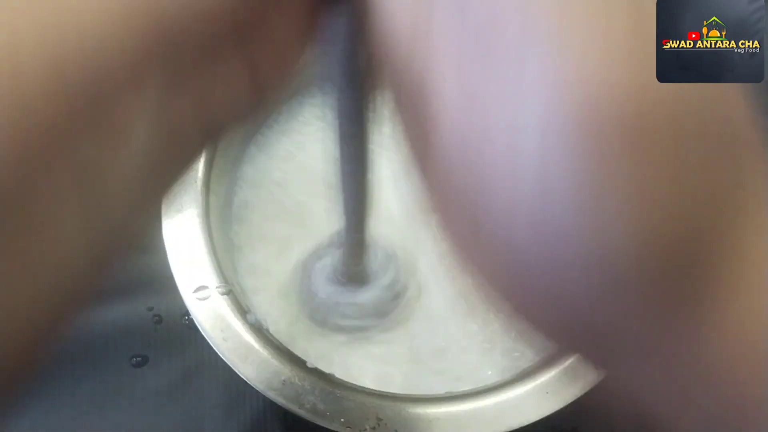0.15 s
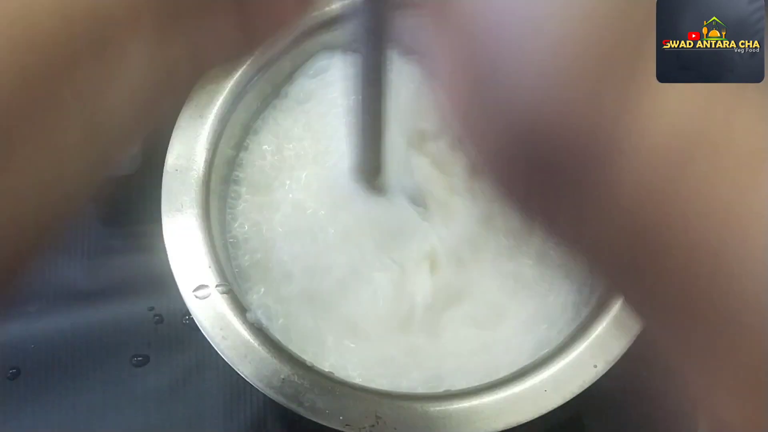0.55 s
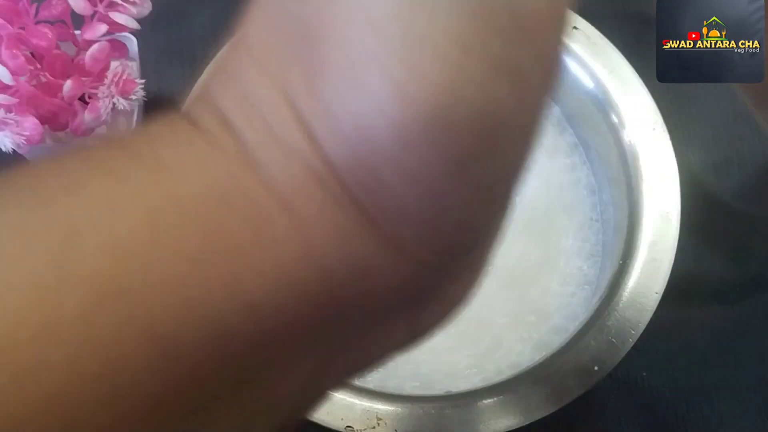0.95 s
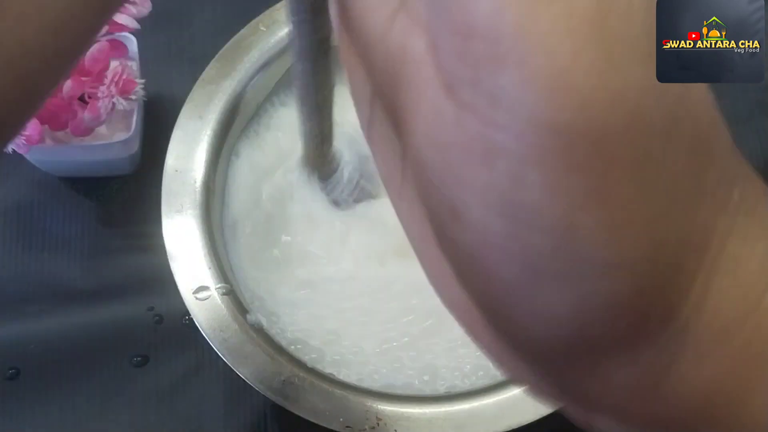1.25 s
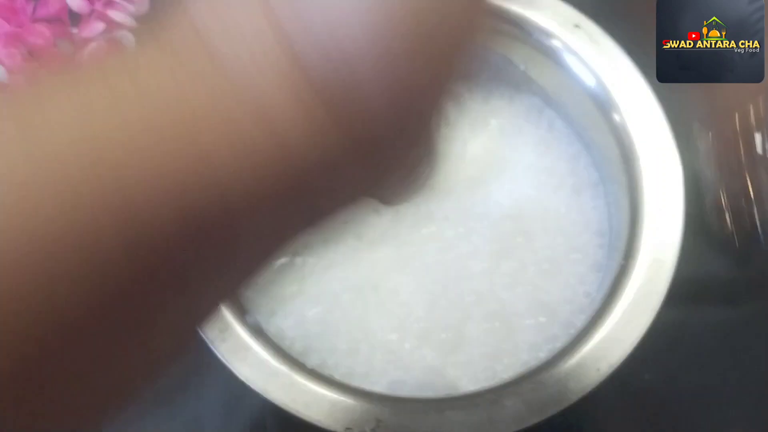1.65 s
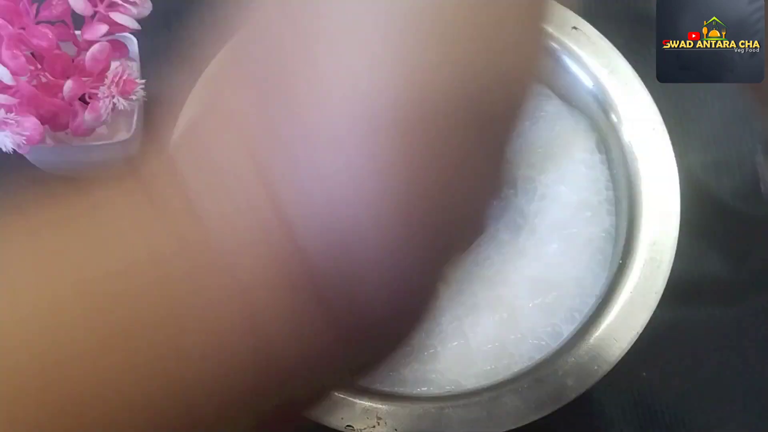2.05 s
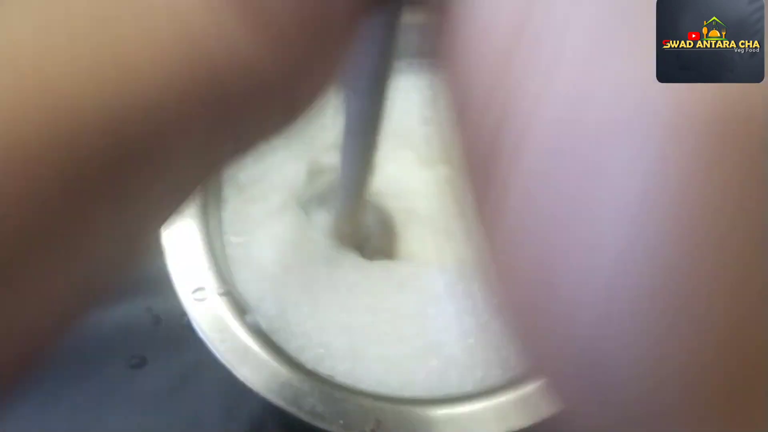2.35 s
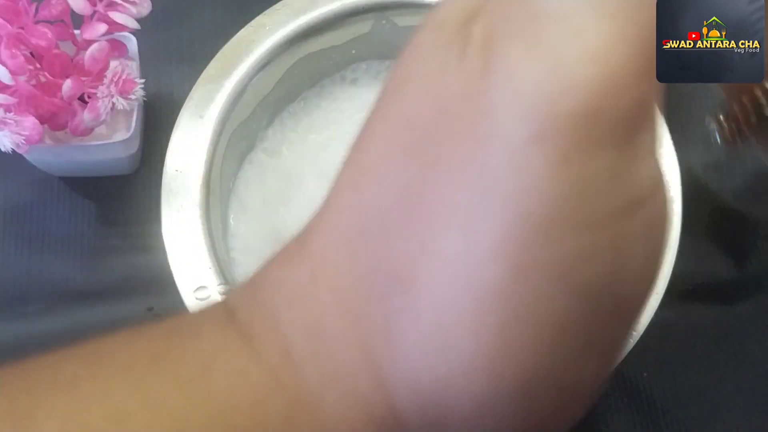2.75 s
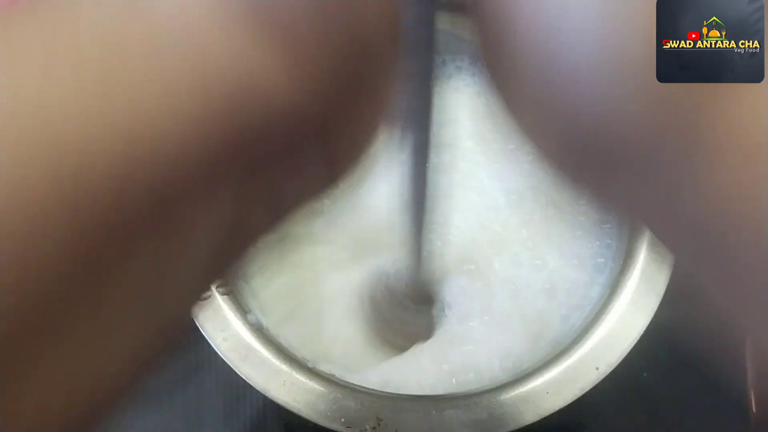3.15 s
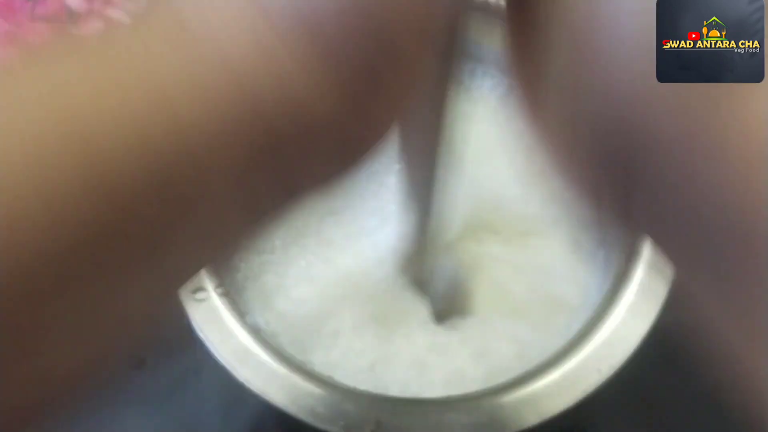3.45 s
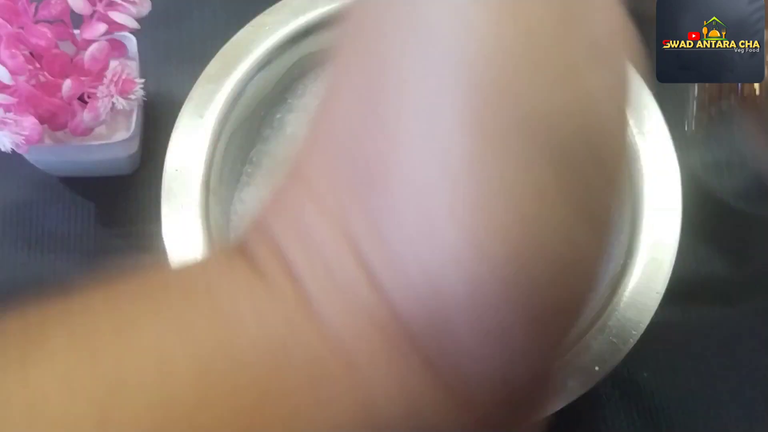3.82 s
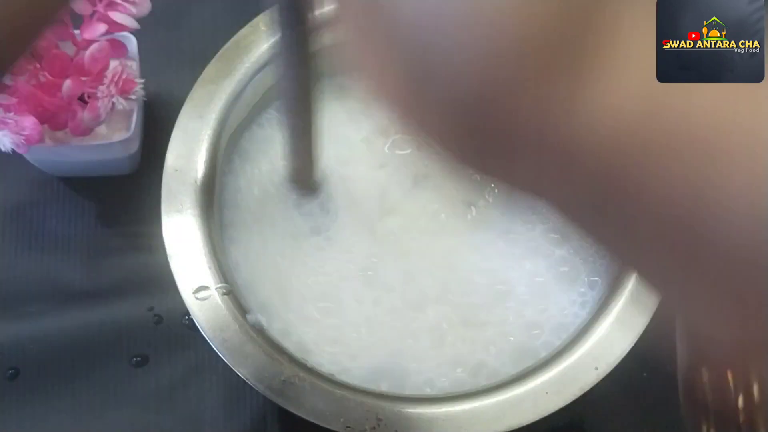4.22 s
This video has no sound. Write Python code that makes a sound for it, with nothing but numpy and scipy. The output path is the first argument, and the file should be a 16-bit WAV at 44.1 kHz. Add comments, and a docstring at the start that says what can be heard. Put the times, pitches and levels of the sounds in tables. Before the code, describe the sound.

Rapid rhythmic swishing of thin yogurt churned in a steel pot, about three strokes a second, with gurgles and hollow knocking gulps, close up.

```python
"""A small kitchen, microphone close to a steel pot of thinned yogurt: a churning stick is rolled back and
forth between the palms, about 3.4 strokes a second. Each stroke whips up bubble clouds (swarms of short
resonances) and spray (noise); cavities gurgle as gliding tones. Air pockets dragged under by the head collapse
with hollow, knock-like gulps (damped pulses). Pot and kitchen ring along; loud gulps overload the dull recorder."""
import sys
import numpy as np
from scipy import signal
from scipy.fft import rfft, irfft, next_fast_len
from scipy.io import wavfile
from scipy.ndimage import uniform_filter1d

SR = 44100
rng = np.random.default_rng(int(sys.argv[2]) if len(sys.argv) > 2 else 0)


def bounce(signal):
    """Save signal as a 16-bit WAV file at the path given by the first command-line argument."""
    frames = np.transpose(np.atleast_2d(signal))
    limited = np.clip(frames, -1, 1)
    pcm = np.round(limited * 32767).astype(np.int16)
    wavfile.write(sys.argv[1], SR, pcm)


N = 193334

# pitch ranges of the bubble sizes slosh, splash, fine bubbles and froth: low_hz, high_hz
BUBBLE_RANGES = [(300, 750), (750, 1300), (1300, 2800), (2800, 7200)]
# strokes of the stick, each spinning the head up and letting it slow; rise and fall reach 10 dB down, before
# the length factor of each bubble size; finer bubbles peak apart from the slosh, froth by the whole delay;
# levels are ahead of the mix: fastest_s, rise_s, fall_s, froth_delay_s, slosh_db, splash_db, fine_db, froth_db
CHURN_STROKES = [ (0.16, 0.086, .078, .014, -25, -31, -37, -38.5),
                 (0.473, 0.067, 0.078, -0.0026, -27, -25.5, -28.5, -33.5),
                 (0.77, 0.059, 0.051, 0.016, -21.5, -19.5, -26.5, -35.5),
                 (1.062, 0.073, 0.059, 0.011, -29.5, -25.5, -32.5, -36),
                 (1.352, 0.052, 0.072, 0.011, -21.5, -17.5, -20.5, -31.5),
                 (1.647, 0.038, 0.093, -0.015, -35, -22, -31, -32),
                 (1.954, 0.064, 0.071, 0.0031, -26.5, -26.5, -28.5, -31.5),
                 (2.265, 0.088, 0.047, 0.00066, -38, -28, -30.5, -49.5),
                 (2.586, 0.061, 0.087, -0.048, -27, -23, -34, -36),
                 (2.803, 0.07, 0.085, -0.0038, -36.5, -26.5, -27.5, -36),
                 (3.126, 0.049, 0.067, -0.013, -25, -23, -27, -37.5),
                 (3.405, 0.064, 0.064, 0.0024, -27.5, -29.5, -33, -37),
                 (3.686, .052, 0.069, 0.0023, -25.5, -27.5, -28, -33.5),
                 (3.975, .066, .05, .02, -24.5, -37, -28, -45),
                 (4.226, 0.037, 0.069, 0.004, -24.5, -23.5, -33, -35.5)]


def swish(swarms_per_s_at_1khz=130, cycles=28, size_db=3, spray_db=-9, lumpy_db=3.0, lumps_per_s=90,
          surge_s=0.031, overlap=1.168):
    """The blades shed bubble clouds and spray; big bubbles come in quick lumps, small ones more evenly."""
    # colour of the churned liquid: pitch_hz, relative level_db per Hz
    liquid_colour = [(260, -21.5), (360, -12), (480, -14), (570, 1), (720, -5.5), (840, -6.5), (1030, 2.5),
                     (1170, -17.5), (1350, -11), (2100, -22), (4200, -30), (5200, -49.5), (6500, -35.5),
                     (7400, -49.5)]
    out = np.zeros(N)
    lumps = waver(np.arange(N) / SR, lumps_per_s)
    for size, (low, high) in enumerate(BUBBLE_RANGES):
        swarms_per_s = swarms_per_s_at_1khz * np.sqrt(high / 1000)
        spray = from_db(spray_db) * rng.standard_normal(N)
        # neighbouring bubble sizes blend into each other
        cloud = spray + bubbles(low / overlap, high * overlap, swarms_per_s, cycles, size_db)
        cloud = band(coloured(cloud, liquid_colour), [low, high], "band", order=3)
        cloud = cloud * from_db(lumpy_db * lumps / (1 + size))
        # the stroke sets the power of the cloud, chance only its fine grain
        power = uniform_filter1d(cloud ** 2, int(surge_s * SR))
        out += surge(size) * cloud / np.sqrt(np.abs(power) + 1e-12)
    return out


def bubbles(low, high, per_s, cycles, size_db, swarm_db=4.5, swarm_s=.035, count=14):
    """Short swarms of bubbles of one size, each bubble decaying 60 dB over some cycles; rms 1."""
    out, span = np.zeros(N), SR // 8
    for start, pitch, strength in rng.random((int(per_s * N / SR), 3)):
        hz = low + (high - low) * pitch
        births = np.zeros(span)
        at = (rng.random(count) * min(swarm_s * SR, span / 2)).astype(int)
        births[at] = from_db(size_db * rng.standard_normal(count)) * rng.choice([-1, 1], count)
        # a few swarms stand out
        gain = from_db(-swarm_db * np.log(max(strength, np.exp(-np.pi))))
        add(out, gain * rms_one(resonate(births, hz, cycles / hz)), start * N / SR)
    return rms_one(out)


def surge(size, rise_roundness=2.27, fall_roundness=2.26, wash_db=-19.5, wash_length=1.52):
    """Level of one bubble size: each stroke swells and dies in a weaker, longer wash; stirring goes on between."""
    # how each size follows a stroke: length factor, lag_s, level between strokes_db
    size_response = [(1.2, 0.0018, -62.5), (1.223, -0.0025, -60), (1.073, -0.0017, -56),
                     (1.032, -0.007, -60.5)]
    stretch, lag, between_db = size_response[size]
    fineness = size / (len(BUBBLE_RANGES) - 1)
    frames = np.arange(0, N, 32)
    t, power = frames / SR - lag, from_db(between_db) ** 2
    for s, rise, fall, froth_delay, *levels_db in CHURN_STROKES:
        since = t - s - fineness * froth_delay
        away = np.maximum(-since / rise, since / fall) / stretch
        # exponent 1 is pointed, 2 bell-shaped, more is squarer
        roundness = np.where(since < 0, rise_roundness, fall_roundness)
        spin_shape_db = -10 * np.minimum(away, 10) ** roundness
        wash_shape_db = wash_db - 10 * np.minimum(away / wash_length, 10) ** 2
        power = power + from_db(levels_db[size] + np.maximum(spin_shape_db, wash_shape_db)) ** 2
    return np.interp(np.arange(N), frames, np.sqrt(power))


def gurgles(tremble=0.025, trembles_per_s=300, flutter_db=6.0, glide_octaves_per_s=.9):
    """A cavity opens behind the blades and closes; it sinks in pitch or rises as it widens or narrows."""
    # the clearest cavities: middle_s, level_db before flutter and mix, mid-glide pitch_hz, length_s
    clear_gurgles = [ (0.119, -31, 1617, 0.067), (0.411, -25.5, 1464, 0.083), (0.447, -18.5, 756, 0.035),
                     (0.501, -26.5, 556.6, 0.096), (0.937, -37, 1330, 0.055), (1.003, -26, 1333, 0.047),
                     (1.05, -23, 982, .04), (1.437, -31, 3513, 0.019), (1.444, -19.5, 1384, 0.029),
                     (1.648, -24.5, 1528, 0.06), (1.723, -22.5, 755.5, 0.034), (1.949, -22.5, 2220, 0.046),
                     (2.237, -27, 1680, .04), (2.272, -19, 1310, 0.036), (2.853, -31, 546, 0.056),
                     (2.941, -28, 465, .035), (3.069, -23, 996, .025), (3.108, -8.5, 883.2, .028),
                     (3.467, -41, 1693, .08), (3.869, -38.5, 1985, 0.066), (3.889, -29, 753, 0.033),
                     (3.897, -33, 1314, 0.08), (3.943, -40, 3630, 0.071)]
    out, t = np.zeros(N), np.arange(SR // 8) / SR
    for s, db, hz, length in clear_gurgles + small_gurgles():
        glide = glide_octaves_per_s * rng.standard_normal()
        swell = np.sin(np.pi * np.minimum(t / length, 1))
        level = from_db(db + flutter_db * waver(t, trembles_per_s))
        pitch = hz * 2 ** (glide * (t - length / 2)) * (1 + tremble * waver(t, trembles_per_s))
        add(out, swell * level * tone(pitch), s - length / 2)
    return out


def small_gurgles(count=2, below_fine_db=-3, length_s=0.02, low_hz=1097, high_hz=2390):
    """Smaller cavities open at chance moments of each stroke; rows like the clear gurgles."""
    rows = []
    for s, rise, fall, *_, fine_db, froth_db in CHURN_STROKES:
        for when, pitch in rng.random((count, 2)):
            middle_s = s - rise + when * (rise + fall)
            rows.append((middle_s, fine_db + below_fine_db, low_hz * (high_hz / low_hz) ** pitch, length_s))
    return rows


def gulps(tremble=0.02, trembles_per_s=350, lowest_hz=290, spatter_db=-10, spatter_above_db=2,
          spatter_hz=4300):
    """Each pulse swells into a damped tone with a trembling pitch; the low cut leaves little bass."""
    # pulses of the gulps, some rows being close reflections of the pulse before:
    # start_s, peak level_db before the mix, pitch_hz, swell_s, t60_s
    gulp_pulses = [ (0.001, -5.5, 504, 0.0016, 0.0083), (0.088, -17, 1070, .002, 0.081),
                   (0.241, -14.5, 538, 0.0015, 0.022), (0.2707, 0, 537, 0.0042, 0.006),
                   (0.2775, -6, 385, .0015, 0.034), (0.281, -10, 826, 0.0025, .018),
                   (0.44, -15.5, 1024, .0016, 0.062), (0.522, -12.5, 720, 0.0054, .018),
                   (0.677, -25, 930, 0.0032, .04), (0.7285, 7, 947, 0.00096, 0.024),
                   (0.7455, 2, 627, 0.0011, .013), (0.981, -20.5, 910, 0.0018, 0.061),
                   (1.285, 0, 550, 0.00092, 0.0035), (1.290, -1.5, 409, 0.00065, 0.03),
                   (1.324, -1.5, 938, .0018, 0.028), (1.331, 10, 981, 0.0023, 0.028),
                   (1.3445, 8.5, 863, 0.0013, 0.0094), (1.388, -13, 1000, 0.00082, 0.019),
                   (1.595, -6, 1005, 0.0017, .064), (1.895, -6.5, 530, 0.00077, 0.034),
                   (1.960, -7, 615, 0.0016, 0.021), (2.243, -13, 1073, 0.0015, 0.047),
                   (2.512, -13, 998, 0.0024, 0.042), (2.5835, 5.5, 570, 0.002, 0.008),
                   (2.589, 3, 596, 0.0019, 0.015), (3.1007, 6.5, 560, 0.0014, 0.014),
                   (3.107, -.5, 500, 0.0022, 0.018), (3.112, 1, 486, 0.0027, 0.012),
                   (3.1698, -3.5, 378, 0.00081, 0.026), (3.512, 0.5, 462, 0.0012, 0.038),
                   (3.5965, 0.5, 567, 0.0029, 0.039), (3.7725, -12.5, 467, 0.00087, 0.034),
                   (4.191, 3.5, 665, 0.0025, 0.0076), (4.2115, 3, 699, .0019, .02),
                   (4.2156, -1, 405, 0.0026, 0.03), (4.235, -4, 450, 0.0026, 0.019),
                   (4.2749, -4, 450, 0.00078, 0.02), (4.307, -1, 510, 0.0016, 0.0082)]
    out, t = np.zeros(N), np.arange(SR // 8) / SR
    for s, db, hz, swell, t60 in gulp_pulses:
        onset = np.sin(np.pi / 2 * np.minimum(t / swell, 1)) ** 2
        size = from_db(db) * onset * np.exp(-np.log(1000) * np.maximum(t - swell, 0) / t60)
        # only the hardest pulses tear the surface and spatter
        tear = np.maximum(size - from_db(spatter_above_db), 0)
        spatter = from_db(spatter_db) * tear * rms_one(band(rng.standard_normal(len(t)), spatter_hz, "low"))
        knock = size * tone(hz * (1 + tremble * waver(t, trembles_per_s)))
        add(out, knock + spatter, s)
    return band(out, lowest_hz, "high", order=4)


def pot(x, lowest_hz=280):
    """The pot rings on with whatever sounds in it, and radiates little below its lowest mode."""
    # ringing of the pot and the air in it: pitch_hz, gain_db before the low cut, t60_s
    pot_modes = [(371.5, -1.5, 0.16), (469, -1, 0.75), (556.3, -2.5, 0.037), (770, -23, 0.39),
                 (744, -4.5, 0.081), (922, -3, 0.12), (993, 0, 0.33), (1053, -5, 0.074), (1270, -13, 0.11),
                 (1300, -15.5, 0.36), (1595, 2.5, 0.052), (1943, 2.5, 0.07), (2090, -22, 0.28),
                 (2580, -29, 0.043), (2555, -5.5, 0.023), (3530, 4, 0.12), (4410, -4.5, 0.076)]
    ringing = sum(from_db(db) * resonate(x, hz, t60) for hz, db, t60 in pot_modes)
    return band(ringing, lowest_hz, "high", order=2)


def kitchen(x, first_echo_s=0.0018, t60_s=0.24):
    """Dense reflections from near walls, dying away."""
    t = np.arange(SR // 2) / SR
    echoes = rng.standard_normal(len(t)) * np.exp(-np.log(1000) * t / t60_s) * (t > first_echo_s)
    return signal.fftconvolve(x, echoes / np.sqrt(np.sum(echoes ** 2)))[:N]


def ambience():
    """Steady background of the kitchen: noise given a fixed spectrum; rms 1."""
    # colour of the background: pitch_hz, relative level_db per Hz
    room_colour = [(30, -55.5), (70, -34.5), (100, -6.5), (128, 6), (165, -3.5), (200, 2.5), (260, -5),
                   (500, -4.5), (1000, -30.5), (3000, -19.5), (7000, -42.5)]
    return coloured(rng.standard_normal(N), room_colour)


def from_db(db):
    """Decibels to gain."""
    return 10 ** (np.asarray(db) / 20)


def rms_one(x):
    """Scale to unit power."""
    return x / np.sqrt(np.mean(x ** 2) + 1e-20)


def coloured(x, spectrum):
    """Filter a steady sound by a spectrum; rms 1."""
    hz, db = np.transpose(spectrum)
    size = next_fast_len(N)
    bins = np.maximum(np.fft.rfftfreq(size, 1 / SR), 1)
    gain = from_db(np.interp(np.log(bins), np.log(hz), db))
    return rms_one(irfft(rfft(x, size) * gain, size)[:N])


def band(x, edges, kind, order=4):
    """Butterworth filter."""
    return signal.sosfilt(signal.butter(order, edges, kind, fs=SR, output="sos"), x)


def resonate(x, hz, t60):
    """One resonance with gain near 1 at its peak."""
    r = np.exp(-np.log(1000) / (t60 * SR))
    feedback = [1, -2 * r * np.cos(2 * np.pi * hz / SR), r * r]
    return signal.lfilter([(1 - r * r) / 2, 0, -(1 - r * r) / 2], feedback, x + 1e-18)


def add(out, sound, s):
    """Mix a sound in from time s on."""
    start = max(int(s * SR), 0)
    out[start:start + len(sound)] += sound[:N - start]


def tone(hz):
    """A sine that follows a pitch curve."""
    return np.sin(2 * np.pi * np.cumsum(hz) / SR)


def waver(t, rate):
    """Random trembling over the times t; spread about 1."""
    return np.interp(t * rate, np.arange(len(t)), rng.standard_normal(len(t)))


def scene(swish_db=-1.5, gurgle_db=-2, gulp_db=-1, swish_ring_db=-1, gulp_ring_db=0, kitchen_db=-10.5,
          ambience_db=-49):
    """Swish, gurgles and gulps in the pot, the pot in the kitchen."""
    liquid = from_db(swish_db) * swish() + from_db(gurgle_db) * gurgles()
    knocks = from_db(gulp_db) * gulps()
    ringing = pot(from_db(swish_ring_db) * liquid + from_db(gulp_ring_db) * knocks)
    near = liquid + knocks + ringing
    return (near + from_db(kitchen_db) * kitchen(near) + from_db(ambience_db) * ambience())[None]


def record(dry, lopsided=0.036, hiss_db=-87.5, mic_top_hz=7250, cutoff_hz=16000):
    """A dull recorder with faint hiss; lopsided overload flattens the peaks into a crack and a thud."""
    # the level dips briefly: from_s, to_s
    brief_dip = (2.076, 2.085)
    t = np.arange(N) / SR
    level = uniform_filter1d(1.0 * ((t < brief_dip[0]) | (t > brief_dip[1])), size=64)
    heard = signal.sosfilt(signal.ellip(8, .5, 60, mic_top_hz, fs=SR, output="sos"), dry * level)
    hiss = from_db(hiss_db) * rng.standard_normal(dry.shape)
    flat = np.clip(heard + hiss, -1, 1)
    overloaded = flat + lopsided * flat ** 2
    return signal.sosfilt(signal.ellip(8, .1, 70, cutoff_hz, fs=SR, output="sos"), overloaded)


dry = scene()
out = record(dry)
bounce(out)
```